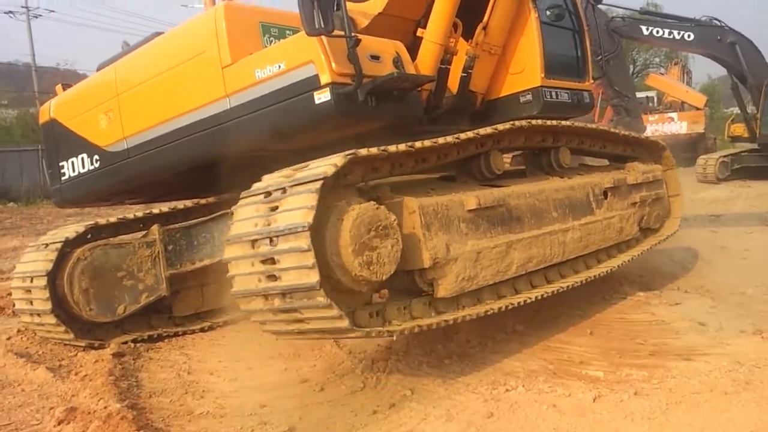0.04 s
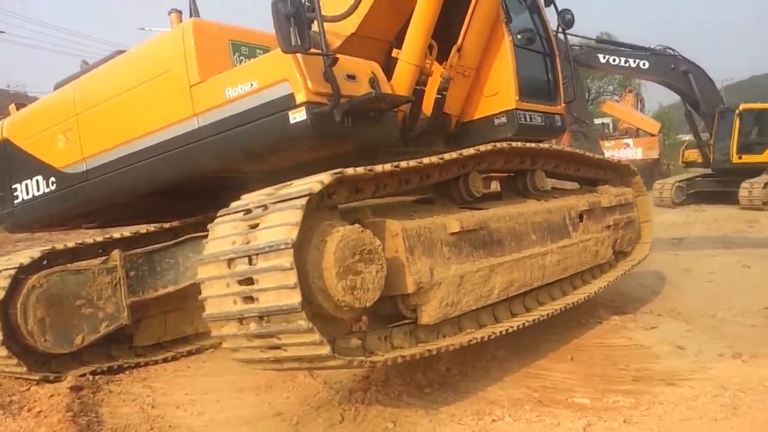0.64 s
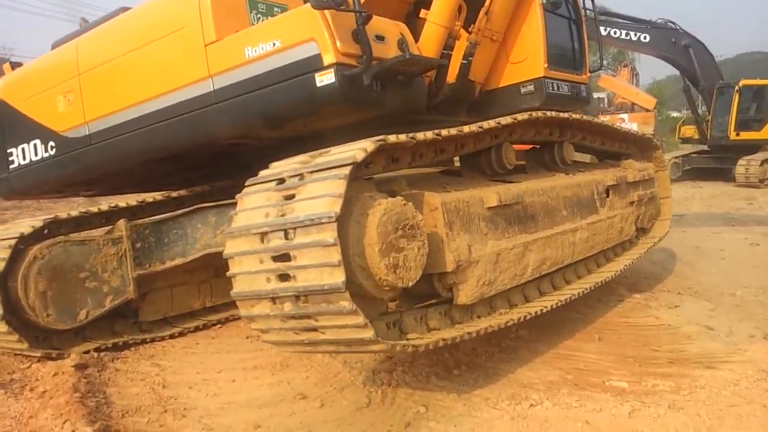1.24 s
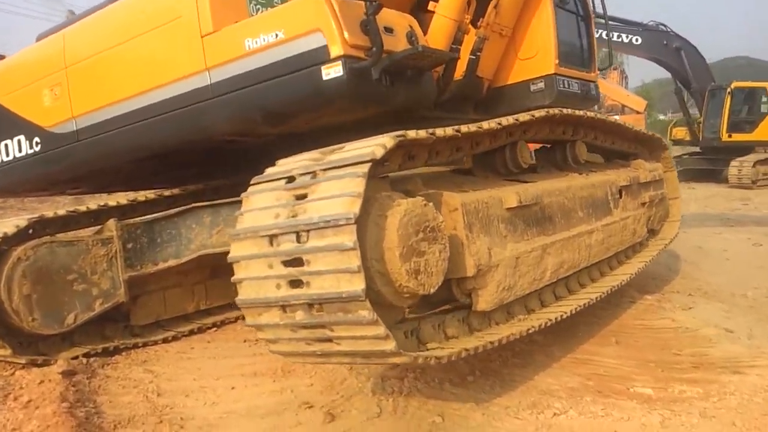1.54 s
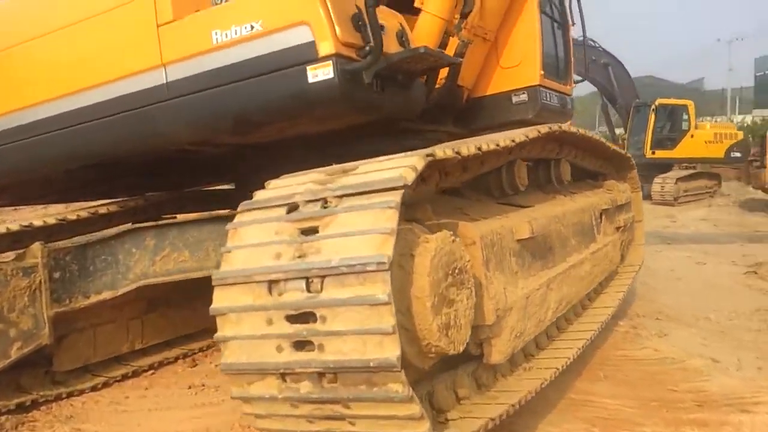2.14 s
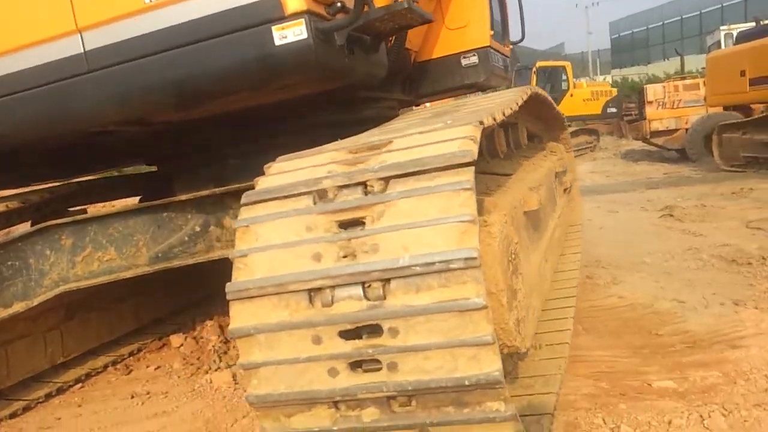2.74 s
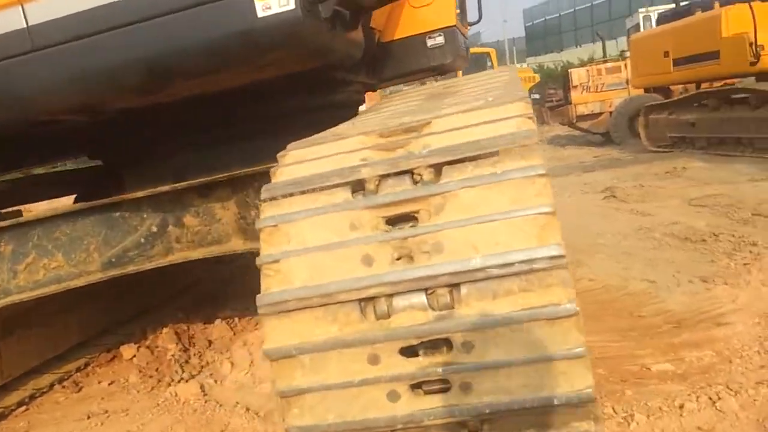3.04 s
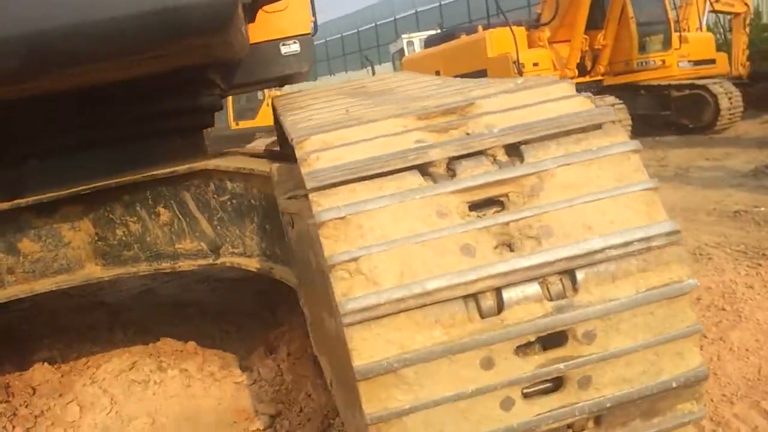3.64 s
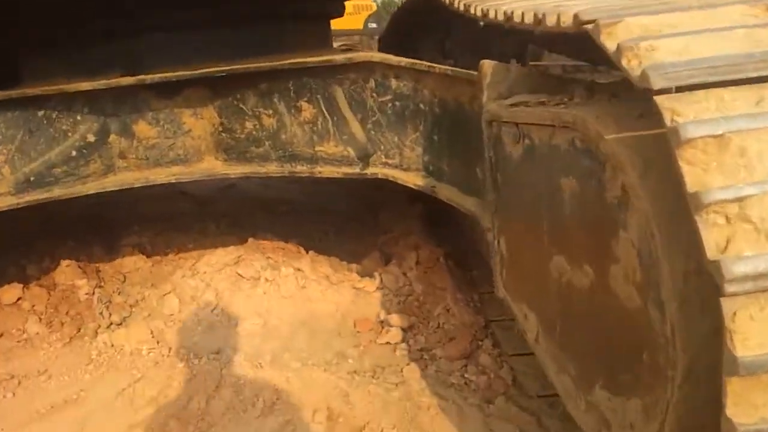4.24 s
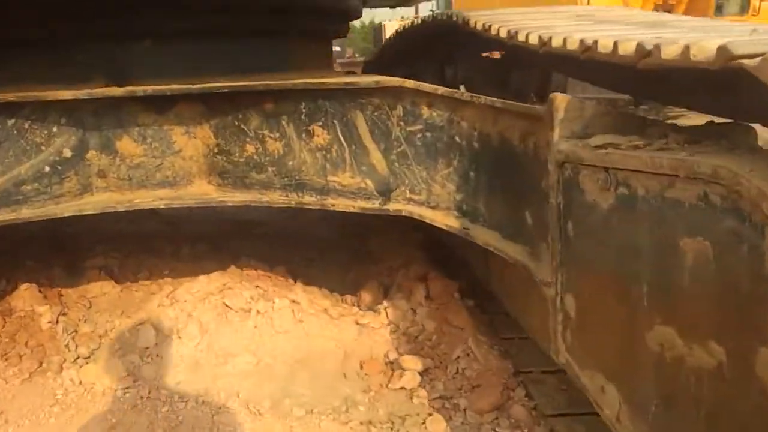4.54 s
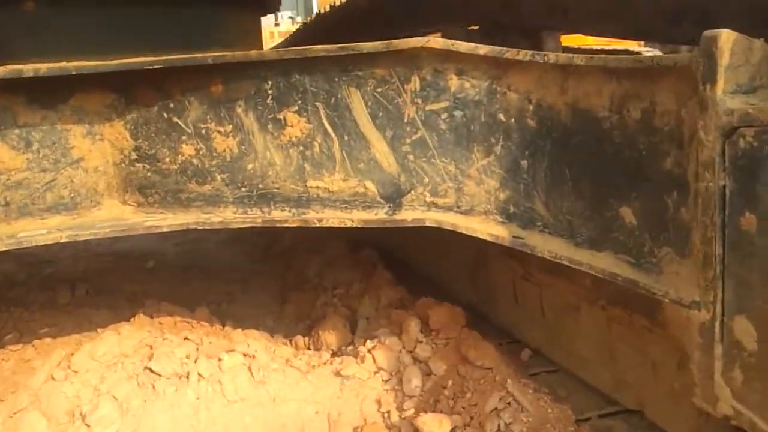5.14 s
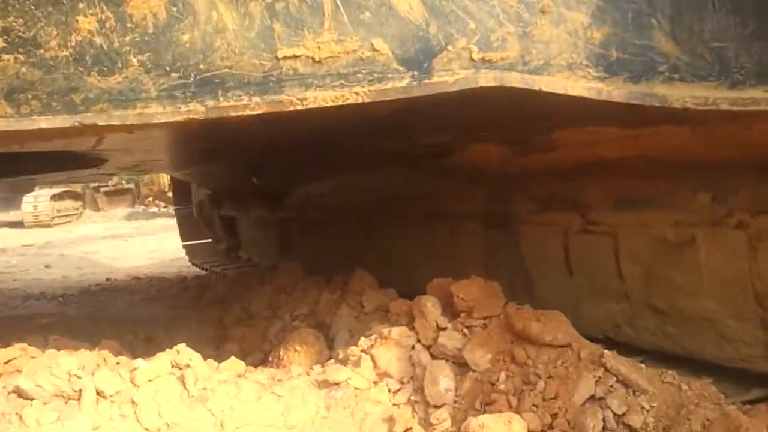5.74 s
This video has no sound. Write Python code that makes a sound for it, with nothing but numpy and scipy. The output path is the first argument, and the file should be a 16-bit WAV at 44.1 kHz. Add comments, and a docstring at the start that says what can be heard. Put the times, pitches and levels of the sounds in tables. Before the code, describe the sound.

An excavator's diesel engine runs outdoors from the start, rumbling and knocking, with a hydraulic pump humming and a steel track rattling lightly as it spins. A thud and a few clanks come right at the beginning, followed by brief metal scrapes at about 0.2 and 0.7 seconds. At about 1 second the engine speeds up, then holds its higher pitch with wavering pump and gear whines. From around 2 seconds everything grows louder as the microphone approaches. Light clanks come between 3.6 and 3.9 seconds. From about 4.2 seconds the microphone dips under the machine, where a hollow low drone and a higher whine swell. The track thuds against its frame and clanks sharply, hardest at about 4.5 and 5.4 seconds, with smaller hits between. The loudest blows slightly overload the microphone. The engine continues close and loud until about 6 seconds.

```python
"""Excavator spinning a lifted track

An excavator spins one steel track in a dirt yard. Its six-cylinder diesel speeds up after a second,
with the hydraulic pump humming on the same shaft. The track's shoes (its steel plates) rattle, scrape,
clank together and thud against the frame. The microphone moves in under the machine, where the
loudest blows overload it."""
import sys
import numpy as np
from scipy import signal
from scipy.fft import rfft, irfft, next_fast_len
from scipy.io import wavfile
from scipy.ndimage import uniform_filter1d, minimum_filter1d, map_coordinates

SR = 44100
rng = np.random.default_rng(int(sys.argv[2]) if len(sys.argv) > 2 else 0)


def unload_wav(signal):
    """Save mono or channel-first audio to the path in sys.argv[1] as 16-bit WAV at rate SR, clipped to [-1, 1]."""
    wavfile.write(
        sys.argv[1],
        SR,
        np.round(np.clip(np.atleast_2d(signal).T, -1, 1) * 32767).astype(np.int16),
    )


N = 260190


def amp(db):
    """Turn decibels into a gain."""
    return 10 ** (np.asarray(db) / 20)


def unit(x):
    """Scale x to an average (rms) level of 1."""
    return x / np.sqrt(np.mean(x ** 2) + 1e-20)


def curve(rows):
    """Join (seconds, value) points with straight lines."""
    return np.interp(np.arange(N) / SR, *np.transpose(rows))


def ramp(start, length):
    """A straight rise from 0 to 1, timed in seconds."""
    return curve([(start, 0), (start + length, 1)])


def wobble(rate):
    """A smooth curve through `rate` random points a second."""
    return map_coordinates(rng.standard_normal(int(N * rate / SR) + 4), [np.arange(N) * rate / SR])


def filtered(x, response):
    """Filter x; response(hz) gives the gain at each frequency."""
    size = next_fast_len(len(x) + 8192)
    hz = np.fft.rfftfreq(size, 1 / SR) + 1e-3
    return irfft(rfft(x, size) * response(hz), size)[:len(x)]


def shape(points, hz):
    """The gain at hz on a line through (Hz, dB) points."""
    freqs, db = np.transpose(points)
    return amp(np.interp(np.log(hz), np.log(freqs), db))


def coloured(x, points):
    """Filter x by (Hz, dB) points and scale it to level 1."""
    return unit(filtered(x, lambda hz: shape(points, hz)))


def resonance(hz, centre, width):
    """The response of something that rings at one pitch."""
    return 1j * hz * width / (centre ** 2 - hz ** 2 + 1j * hz * width)


def add(out, start, sound):
    """Mix a sound in at `start` seconds."""
    part = out[max(round(start * SR), 0):][:len(sound)]
    part += sound[:len(part)]


# Engine speed. Each row: time in seconds, cylinder firings per second.
FIRING_RATE = [(0, 71.5), (0.96, 71.1), (1.08, 82.9), (1.45, 83.7), (2.7, 83.1), (4.2, 83.5), (4.8, 84.3),
               (5.5, 82.5), (5.9, 83.3)]
# The walk up to the machine. Each row: time in seconds, nearness in dB.
NEARNESS = [(0.5, 0), (1.6, -0.2), (2.8, 3.5), (4, 5.5), (4.7, 8), (5.3, 11), (5.9, 11)]
# Each named row: level in dB far off at idle, dB per dB of nearness, change in dB with open throttle.
LAYER_LEVELS = {"rumble": (-30, 0.42, -3.5), "drone": (-36, 0.55, 5.8), "block": (-29.5, 0.92, 0.6),
                "clatter": (-36, 0.98, 4.14), "tones": (-34, 0.068, 4.24), "high mesh": (-66, 0.98, 4.5)}
UNDER_S, DIP_S = 4.25, 1  # when the microphone dips under the hull, and how long that takes

def level(layer):
    """A layer's gain follows the microphone's nearness and the engine's speed."""
    idle_db, growth, throttle_db = LAYER_LEVELS[layer]
    speed = curve(FIRING_RATE)
    throttle = (speed - speed.min()) / np.ptp(speed)
    return amp(idle_db + growth * curve(NEARNESS) + throttle_db * throttle)


# The hollow under the machine. Each row: frequency in Hz, relative level in dB.
HULL_SPECTRUM = [(60, -26), (95, 0), (125, 4.5), (160, 0.5), (205, -1.5), (270, -5.5), (330, -3),
                 (600, -63.5)]

def hull_drone(rise_db=5.5, rise_s=0.34):
    """The hollow under the hull drones, louder once the microphone is inside."""
    inside = amp(rise_db * ramp(UNDER_S, rise_s))
    return level("drone") * inside * coloured(rng.standard_normal(N), HULL_SPECTRUM)


def cyclic(cycles, alike, size=3200):
    """Noise of which the share `alike` repeats with every engine cycle."""
    pattern = map_coordinates(rng.standard_normal(size), [cycles % 1 * size], mode="grid-wrap")
    return np.sqrt(alike) * pattern + np.sqrt(1 - alike) * rng.standard_normal(N)


# One number per cylinder: how strongly it knocks.
CYLINDERS = [1, 0.85, 0.82, 1, 0.53, 0.43]

def knocking(cycles, depth, fade):
    """A gain that jumps as each cylinder fires and fades before the next."""
    firings = cycles * len(CYLINDERS)
    strength = np.take(CYLINDERS, firings.astype(int) % len(CYLINDERS))
    return 1 + depth * strength * np.exp(-(firings % 1) / fade)


# The diesel's three noises. Each row: frequency in Hz, relative level in dB.
RUMBLE_SPECTRUM = [(20, -50), (28, -34.5), (36, -18.5), (48, -9), (62, -3), (85, 0.5), (110, -6.5),
                   (200, -28.5), (400, -62)]
BLOCK_SPECTRUM = [(150, -49.5), (290, -4), (370, -3), (450, 2), (500, -0.5), (560, 4), (640, -3), (800, -2),
                  (980, -2.5), (1200, -5), (1500, -8.5), (2500, -46)]
CLATTER_SPECTRUM = [(700, -31), (1250, -14), (1530, 1), (1750, -0.5), (2000, 0), (2200, -0.5), (2500, 2),
                    (2900, 1), (3300, -10), (3700, -9.5), (4400, -8.5), (5100, -9), (6200, -17),
                    (8000, -32.5)]

def diesel(cycles, under_db=4.5):
    """The exhaust rumbles, the engine block knocks and the fuel injectors clatter."""
    under_hull = amp(under_db * ramp(UNDER_S, DIP_S) ** 2)
    rumble = under_hull * coloured(cyclic(cycles, alike=0.66), RUMBLE_SPECTRUM)
    block = cyclic(cycles, alike=0.44) * knocking(cycles, depth=0.7, fade=0.21)
    clatter = cyclic(cycles, alike=0.38) * knocking(cycles, depth=0.2, fade=0.27)
    return (level("rumble") * rumble
            + level("block") * coloured(block, BLOCK_SPECTRUM)
            + level("clatter") * coloured(clatter, CLATTER_SPECTRUM))


def tone(cycles, order, waver, waver_rate=8.7):
    """A wavering tone of level 1 that vibrates `order` times per engine cycle."""
    return np.sqrt(2) * np.sin(2 * np.pi * (order * cycles + rng.random()) + waver * wobble(waver_rate))


# Tones of the engine and its gears. Each row: vibrations per engine cycle, relative level in dB.
ENGINE_TONES = [(4, -8), (6, 0.5), (8, -3.5), (9, -6), (14, -1.5), (15, -4), (16, 3.5), (21, -11.5),
                (24, -1.5), (28, -8.5), (32, -6.5), (34, -5.5), (39, -6.5), (40, -10), (48, -11.5),
                (56, -19.5), (59, -12.5), (60, -7.5), (62, -9.5), (66, -8.5), (68, -10), (70, -15),
                (72, -14), (90, -14), (126, -19), (162, -21.5), (286, -21.5), (324, -20.5)]

def engine_tones(cycles):
    """Unequal cylinders make tones at multiples of the engine's cycle rate."""
    tones = sum(amp(db + 1.5 * wobble(3.2)) * tone(cycles, order, waver=0.2, waver_rate=8)
                for order, db in ENGINE_TONES)
    return level("tones") * tones / np.sqrt(2)


# The exhaust's hum. Each row: time in seconds, level in dB.
EXHAUST_LEVELS = [(0.8, -42.5), (1.5, -35), (3.15, -38.5), (3.7, -24.5), (4.15, -19.5), (4.5, -33.5),
                  (5.12, -16.5), (5.37, -31.5), (5.68, -21.5)]

def exhaust_hum(cycles):
    """A hum at twice the firing rate, loudest in the standing waves by the hull."""
    return amp(curve(EXHAUST_LEVELS)) * tone(cycles, order=12, waver=0.09)


# The lower of two gear whines. Each row: time in seconds, level in dB.
GEAR_LEVELS = [(0.9, -49.5), (1.3, -44), (2.03, -44), (2.16, -30.5), (2.34, -39.5), (2.7, -44), (3.6, -40),
               (5.1, -38.5), (5.6, -30)]

def gears(cycles, flutter, under_db=20):
    """Meshing teeth whine at two pitches; the higher one swells under the hull."""
    low = amp(curve(GEAR_LEVELS)) * tone(cycles, order=108, waver=0.85)
    high = level("high mesh") * tone(cycles, order=144, waver=0.8)
    return flutter * (low + amp(under_db * ramp(UNDER_S, DIP_S)) * high)


# The pump's hum and its whines at two and three times that pitch. Each row: time in seconds, level in dB.
HUM_LEVELS = [(0.22, -35), (0.36, -26), (0.92, -26.5), (1.02, -32), (1.2, -33.5), (2.899, -31.5),
              (3.3, -23), (4.15, -17.5), (5.3, -18.5), (5.6, -25)]
OCTAVE_LEVELS = [(0.95, -45), (1.1, -30), (1.35, -26.5), (1.9, -24.5), (2.25, -28.5), (2.55, -26),
                 (2.8, -32), (3.25, -22), (3.45, -33), (3.9, -32), (4.15, -20.5), (4.4, -20.5), (4.7, -29),
                 (5.35, -26), (5.9, -32)]
THIRD_LEVELS = [(1, -60), (1.4, -40.5), (2.7, -49.5), (3.25, -29), (4.199, -36), (5.9, -30.5)]

def pump(cycles, flutter):
    """Nine pistons make the oil pressure ripple at three times the firing rate."""
    hum = amp(curve(HUM_LEVELS)) * tone(cycles, order=18, waver=0.073)
    octave = amp(curve(OCTAVE_LEVELS) + 1.1 * wobble(16)) * tone(cycles, order=36, waver=0.15)
    third = amp(curve(THIRD_LEVELS)) * tone(cycles, order=54, waver=0.79)
    return hum + octave + flutter * third


# The notes of the shoes and pins. Each row: pitch in Hz, width in Hz, relative level in dB.
SHOE_NOTES = [(840, 160, 6.5), (1110, 97, 5.5), (1885, 260, 4.5), (2415, 120, 7), (2730, 67, 5),
              (3320, 190, 1.5), (3950, 320, -1), (4340, 160, 1), (4580, 110, -2.5), (4930, 100, -0.5),
              (5100, 110, -3), (5820, 420, -3.5)]

def steel(hz, damping):
    """How a shoe rings; pressing on another damps it, which widens each note."""
    return sum((-1) ** k * amp(db) * resonance(hz, pitch, width * damping)
               for k, (pitch, width, db) in enumerate(SHOE_NOTES))


def rattle(hits_per_s=45, spread_db=4, level_db=-16.5, fade_s=0.063):
    """Loose pins and shoes chatter at random as the chain runs round."""
    when, force = rng.random((int(hits_per_s * N / SR), 2)).T
    hits = np.bincount((when * N).astype(int), amp(-spread_db * np.log(1 - 0.95 * force)), N)
    decay = amp(-60 * np.arange(SR // 10) / SR / fade_s)
    bursts = signal.fftconvolve(hits, decay)[:N] * rng.standard_normal(N)
    chatter = unit(filtered(bursts, lambda hz: steel(hz, damping=3)))
    return amp(level_db) * level("clatter") * chatter


def contact(hz, main_hz, octaves, others):
    """The spot that is touched favours notes near main_hz; the rest get the gain `others`."""
    return others + np.exp(-0.5 * (np.log2(hz / main_hz) / octaves) ** 2)


# Each row: start in seconds, level in dB, main pitch in Hz, spread in octaves, length in seconds.
SHOE_SCRAPES = [(0.166, -30.5, 4060, 0.55, 0.043), (0.641, -30, 2400, 0.6, 0.02),
                (0.664, -25, 2200, 0.6, 0.015), (0.674, -24, 2080, 0.58, 0.028),
                (4.129, -31, 4480, .12, 0.078)]

def scrapes():
    """A dirty shoe drags along its guide: a rasp that swells and fades."""
    out = np.zeros(N)
    for start, db, main_hz, octaves, length in SHOE_SCRAPES:
        stroke = np.sin(np.pi * np.linspace(0, 1, int(length * SR)))
        body = lambda hz: steel(hz, damping=2.3) * contact(hz, main_hz, octaves, others=0.1)
        rasp = unit(filtered(rng.standard_normal(len(stroke)), body))
        add(out, start, amp(db) * stroke * rasp)
    return out


def blow(body, notes, ring_share, fade_s, attack_s, smear):
    """One fading hit: part scrape, part ringing (Hz, gain) notes that drift as the parts shift."""
    t = np.arange(SR // 2) / SR
    scrape = unit(filtered(rng.standard_normal(len(t)), body))
    drift = lambda: smear * np.cumsum(rng.standard_normal(len(t))) / np.sqrt(SR)
    ring = unit(sum(gain * np.sin(2 * np.pi * (hz * t + rng.random()) + drift()) for hz, gain in notes))
    envelope = amp(-60 * t / fade_s) * (1 - np.exp(-t / attack_s))
    return (np.sqrt(1 - ring_share) * scrape + np.sqrt(ring_share) * ring) * envelope


# The track frame's noise and its notes. Each row: frequency in Hz, relative level in dB.
FRAME_SPECTRUM = [(30, -37), (70, -5), (160, -11.5), (450, -4.5), (900, -8.5), (1400, -11), (3000, -17.5),
                  (6000, -22.5)]
FRAME_NOTES = [(130, 4), (290, 0), (370, -2), (436, 4.5), (505, 3), (580, -1), (630, -0.5), (778, 1),
               (855, -2), (992, 0)]
# Each row: start in seconds, relative level in dB, boom pitch in Hz, spread in octaves,
# seconds to fade by 60 dB.
CHAIN_THUDS = [(.006, -4.5, 260, 1.7, 0.17), (.03, -16, 642, 0.39, 0.23), (.05, -18, 196, 0.82, 0.66),
               (4.208, -11.5, 367, 0.092, 0.11), (4.219, -12.5, 670, 0.22, 0.094),
               (4.379, -12, 376, 0.2, 0.092), (4.495, -20.5, 1064, .15, 0.13),
               (4.521, -1.5, 974, 0.25, 0.18), (4.522, -2, 434, 0.091, 0.26), (4.545, -10.5, 487, .5, 0.11),
               (4.736, -4, 595, .6, 0.043), (4.781, -12.5, 827, 0.65, .1), (4.939, -0.5, 620, 0.33, 0.035),
               (5.243, -11, 698, 0.61, 0.16), (5.346, -3, 850, 0.048, 0.091), (5.378, -7, 848, 0.09, 0.1),
               (5.394, -7.5, 887, .2, 0.07)]

def thuds(boom_db=13, boom_width_hz=130):
    """The slack chain slaps the hollow frame, which booms."""
    out = np.zeros(N)
    for start, db, boom_hz, octaves, fade_s in CHAIN_THUDS:
        boom = lambda hz: 1 + amp(boom_db) * abs(resonance(hz, boom_hz, boom_width_hz))
        body = lambda hz: shape(FRAME_SPECTRUM, hz) * boom(hz)
        notes = [(hz * rng.normal(1, 0.012), amp(note_db) * contact(hz, boom_hz, octaves, others=0.04))
                 for hz, note_db in FRAME_NOTES]
        thud = blow(body, notes, ring_share=0.56, fade_s=fade_s, attack_s=0.0019, smear=4)
        add(out, start, amp(db + 4.5) * thud)
    return out


# The click that starts a clank. Each row: frequency in Hz, relative level in dB.
CRACK_SPECTRUM = [(300, -20), (900, 0), (2500, -6), (5000, -8.5), (8000, -25.5)]

def crack(fade_s=0.022):
    """The first instant of steel on steel is a short burst of noise."""
    t = np.arange(SR // 10) / SR
    return coloured(rng.standard_normal(len(t)), CRACK_SPECTRUM) * amp(-60 * t / fade_s)


# Each row: start in seconds, relative level in dB, main pitch in Hz, spread in octaves,
# seconds to fade by 60 dB, share that rings rather than scrapes (0 to 1).
SHOE_CLANKS = [(.008, -12, 4340, 1.1, 0.052, 0.5), (.009, -16, 4410, 0.09, 0.064, 0.8),
               (.061, -17, 4440, 0.45, 0.042, 0.5), (0.101, -24.5, 2000, 0.22, 0.085, .3),
               (3.585, -19.5, 4400, 0.12, 0.058, .75), (3.586, -21, 1880, 0.64, 0.063, 0.2),
               (3.677, -21, 4470, 0.11, 0.068, 0.5), (3.679, -22.5, 2300, .6, .06, 0.2),
               (3.712, -20.5, 4400, 0.44, 0.038, 0.6), (3.862, -21.5, 4550, 0.17, 0.053, 0.5),
               (4.494, -14, 1885, 0.094, .15, 0.6), (4.496, -20.5, 4370, 0.087, .08, .7),
               (4.502, -15, 4970, 0.08, 0.083, 0.9), (4.518, -8.5, 2510, 0.19, 0.14, 0.5),
               (4.527, -11, 1057, 0.11, 0.2, 1), (4.539, -11, 3190, 0.16, 0.12, 0.8),
               (4.558, -13, 3770, 0.13, 0.052, .7), (4.592, -22, 4870, 0.13, .06, .6),
               (4.78, -11.5, 2960, 0.35, 0.084, 0.4), (4.785, -16.5, 5830, 0.13, 0.056, 0.4),
               (4.868, -23, 3480, 0.22, 0.091, 0.7), (5.343, -8, 4880, .1, 0.061, 0.7),
               (5.345, -7, 2740, 0.07, 0.11, 0.8), (5.351, -11.5, 3900, .08, 0.073, .85),
               (5.371, -7, 4780, .13, 0.059, .78), (5.373, -4.5, 2590, 0.09, 0.083, 0.85),
               (5.381, -8, 3950, .1, .055, 0.7), (5.393, -13, 4470, 0.12, 0.073, 0.8)]

def clanks():
    """Shoe strikes shoe: a sharp crack, then the steel rings."""
    out = np.zeros(N)
    for start, db, main_hz, octaves, fade_s, ring_share in SHOE_CLANKS:
        favour = lambda hz: contact(hz, main_hz, octaves, others=0.12)
        body = lambda hz: steel(hz, damping=2.4) * favour(hz)
        notes = [(hz * rng.normal(1, 0.0081), amp(note_db + rng.normal(0, 2)) * favour(hz))
                 for hz, _, note_db in SHOE_NOTES]
        clank = blow(body, notes, ring_share, fade_s, attack_s=0.0023, smear=4.5)
        add(out, start, amp(db + 3.5) * clank)
        add(out, start, amp(db) * crack())
    return out


def scene():
    """Engine, gears and pump turn together; the track runs beside them."""
    cycles = np.cumsum(curve(FIRING_RATE)) / SR / len(CYLINDERS)  # each cylinder fires once a cycle
    engine = hull_drone() + diesel(cycles) + engine_tones(cycles) + exhaust_hum(cycles)
    flutter = amp(2.2 * wobble(25))  # the high whines flicker together
    drive = gears(cycles, flutter) + pump(cycles, flutter)
    track = rattle() + scrapes() + thuds() + clanks()
    return (engine + drive + track)[None]


def limited(x, top, depth_db, window=130):
    """A fast limiter turns peaks above `top` down, by depth_db at most."""
    needed = np.clip(top / (np.abs(x) + 1e-9), amp(-depth_db), 1)
    return x * uniform_filter1d(minimum_filter1d(needed, window), window)


def record(dry, dull_hz=5900, clip_level=0.725, top_hz=15800):
    """A steep treble cut above about 6 kHz dulls the sound; big blows are limited, yet still overload."""
    dull = filtered(dry[0], lambda hz: 1 / np.sqrt(1 + (hz / dull_hz) ** 24))
    held = limited(dull, top=0.71, depth_db=1.5)
    clipped = held / (1 + np.abs(held / clip_level) ** 50) ** (1 / 50)
    return filtered(clipped, lambda hz: hz < top_hz)[None]


dry = scene()
out = record(dry)
unload_wav(out)
```